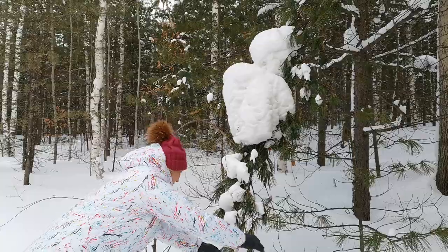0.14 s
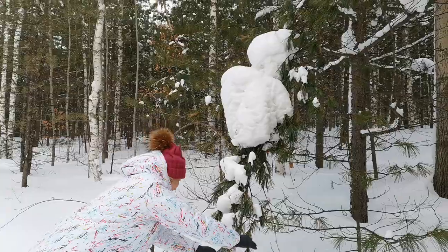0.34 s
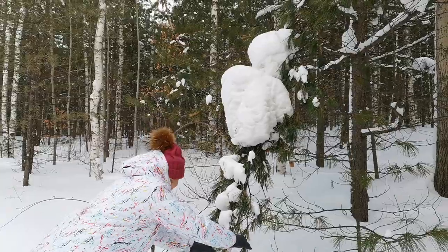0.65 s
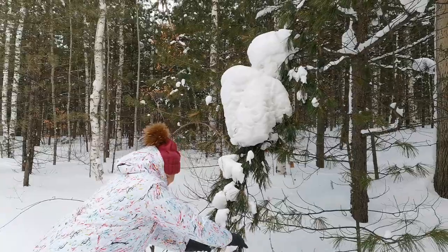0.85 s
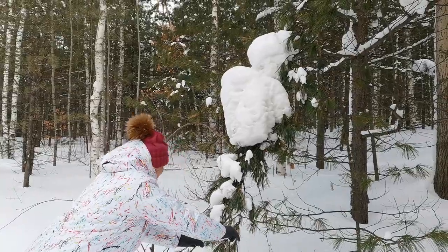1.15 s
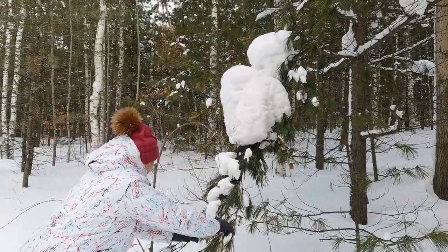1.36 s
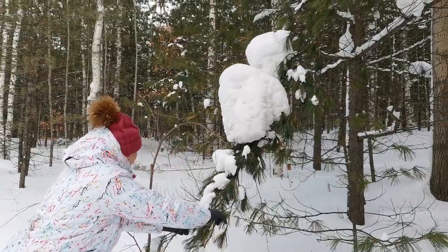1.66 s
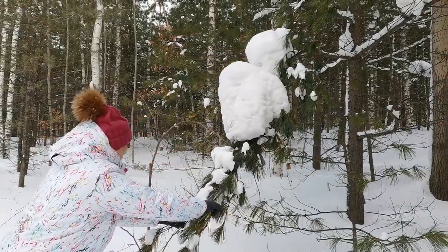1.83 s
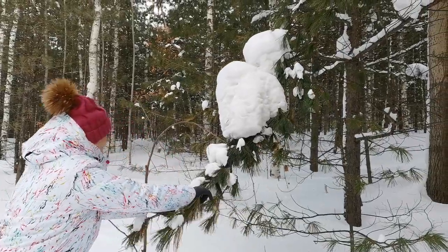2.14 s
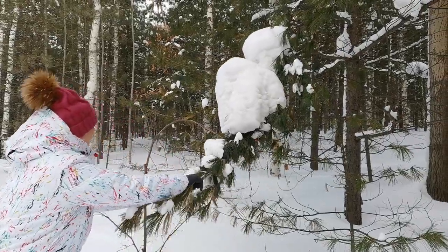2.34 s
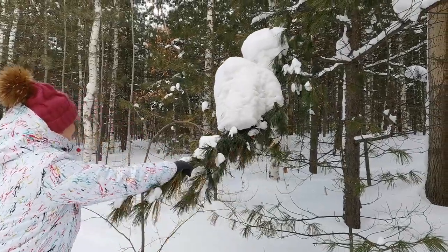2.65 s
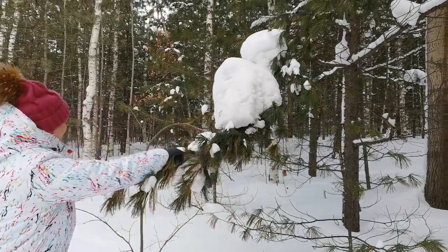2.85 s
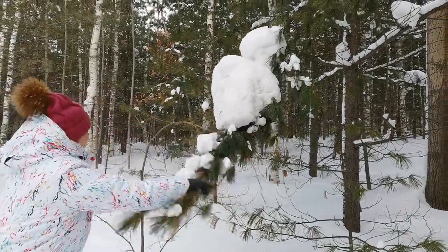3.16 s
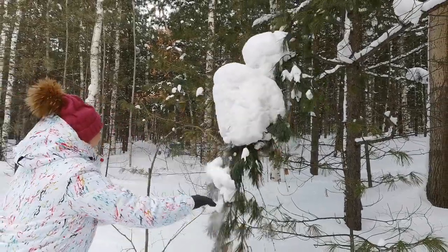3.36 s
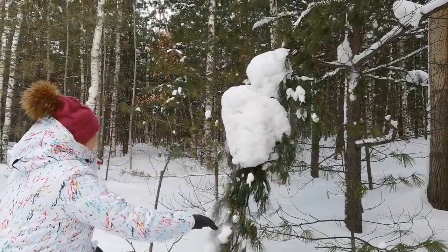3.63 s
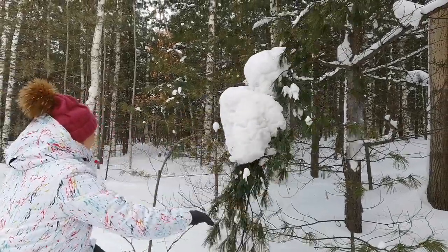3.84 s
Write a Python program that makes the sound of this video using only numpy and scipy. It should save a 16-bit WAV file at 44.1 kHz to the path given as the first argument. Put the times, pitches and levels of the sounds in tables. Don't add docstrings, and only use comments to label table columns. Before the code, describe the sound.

Packed snow creaks and crunches softly while coat and frozen pine needles rustle and tick outdoors

```python
import sys
import numpy as np
from scipy import signal
from scipy.fft import rfft, irfft
from scipy.io import wavfile
from scipy.ndimage import uniform_filter1d

SR = 44100
rng = np.random.default_rng(int(sys.argv[2]) if len(sys.argv) > 2 else 0)


def inscribe(sig):
    pcm = np.round(np.clip(np.atleast_2d(sig).T, -1, 1) * 32767)
    wavfile.write(sys.argv[1], SR, pcm.astype(np.int16))


def decibels_to_gain(level_db):
    exponent = np.asarray(level_db, float) / 20
    return 10 ** exponent


N = 176400


def evened(x):
    return x / np.sqrt(np.mean(x ** 2) + 1e-20)


def colour(x, points, late_s=0):
    hz = np.fft.rfftfreq(N, 1 / SR)
    f, db = np.transpose(points)
    gain = decibels_to_gain(np.interp(np.log(hz + 1), np.log(f), db))
    return irfft(rfft(x) * gain * np.exp(-2j * np.pi * hz * late_s), N)


def pair(x, other, same, late_s):
    same = np.clip(same, 0, 1)
    right = same * x + np.sqrt(1 - same ** 2) * other
    return np.array([x, colour(right, [(1, 0)], late_s)])


def drift(seconds):
    size = max(int(seconds * SR), 2)
    smooth = uniform_filter1d(rng.standard_normal(N), size)
    return evened(uniform_filter1d(smooth, size))


def add(mix, s, sound):
    part = mix[..., round(s * SR):][..., :sound.shape[-1]]
    part += sound[..., :part.shape[-1]]


def resonate(x, hz, width):
    r = np.exp(-np.pi * width / SR)
    return signal.lfilter([1 - r, 0, r - 1], [1, -2 * r * np.cos(2 * np.pi * hz / SR), r * r], x)


def swells(rows, share):
    t = np.arange(N) / SR
    total = np.zeros(N)
    for s, half, hz, db in rows:
        tone = resonate(rng.standard_normal(N), hz, share * hz)
        tone = evened(resonate(tone, hz, share * hz))
        total += decibels_to_gain(db) * np.exp(-((t - s) / half) ** 4) * tone
    return total


# multiple of the idle rate, level in dB, phase lead in cycles.
ORDERS = [(1, -70, .46), (2, -66, -.36), (3, -73, .46)]
# frequency in Hz, level in dB.
CLATTER = [(450, -16.5), (1000, 0), (1600, 0), (3350, -2.5), (3650, -13), (4100, -6.5), (4500, -0.5),
           (5100, -4.5), (5700, -13), (16000, -22)]
# frequency in Hz, width in Hz, level in dB.
CASING = [(930, 14, -2), (1386, 30, -3), (2072, 30, 0), (2490, 20, -5), (2745, 20, -3), (2841, 22, -1),
          (3100, 200, 3)]
IDLE_HZ, FIRST_S = 32.38, .4057
CLATTER_DB, CASING_DB, CLATTER_SAME = -54, -61.5, 0.58
VALVE_GAP_S, PUFF_S, STEADY = .002, 0.0049, 1


def engine():
    t = np.arange(N) / SR
    hum = sum(decibels_to_gain(db) * np.cos(2 * np.pi * (k * IDLE_HZ * t + ahead)) for k, db, ahead in ORDERS)

    turns = (t - FIRST_S) * IDLE_HZ + 0.014 * drift(0.27)
    since = (turns % 1) / IDLE_HZ
    strengths = decibels_to_gain(2.5 * np.clip(rng.standard_normal(200), -2, 1))
    force = strengths[turns.astype(int) + 20]
    late = since - VALVE_GAP_S
    first_knock = 0.88 * np.exp(-since / 0.0025)
    puff = (late > 0) * np.exp(-abs(late) / PUFF_S)
    second_knock = 0.21 * np.exp(-((since - .012) / 0.0016) ** 2)
    gate = STEADY + force * (first_knock + puff + second_knock)
    drive = gate * rng.standard_normal((2, N)) * decibels_to_gain(0.64 * drift(0.005))

    ring = np.zeros((2, N))
    for hz, width, db in CASING:
        ring += decibels_to_gain(db) * evened(resonate(drive, hz, width)) * decibels_to_gain(2.5 * drift(.05))
    noise = decibels_to_gain(CLATTER_DB) * evened(colour(drive, CLATTER)) + decibels_to_gain(CASING_DB) * evened(ring)
    balance = decibels_to_gain(np.array([[-1], [1]]) * 0.96)
    return hum + balance * pair(*noise, CLATTER_SAME, 0.00037)


# frequency in Hz, level in dB.
RUMBLE = [(15, -2), (40, -14), (80, -5.5), (140, -2), (220, -1.5), (330, -10), (550, -11.5), (1200, -23.5)]
RUMBLE_DB, RUMBLE_SAME = -60, .985
OPEN_S = .3812


def rumble():
    opening = np.exp(-abs(np.arange(N) / SR - OPEN_S) / 0.1)
    lumps = decibels_to_gain(1.4 * drift(0.04) + 3 * opening)
    air = evened(colour(rng.standard_normal((2, N)), RUMBLE)) * lumps
    return decibels_to_gain(RUMBLE_DB) * pair(*air, RUMBLE_SAME, 0.00019)


# time in seconds, level in dB.
SWAY = [
    (.4, -71),
    (1.05, -63.5),
    (1.4, -51.5),
    (2.05, -57),
    (2.85, -50),
    (3.7, -48.5),
    (4, -49.5),
]
# start in seconds, length in seconds, level in dB, brightness in dB.
STROKES = [(1.04, 0.026, -54, -5), (1.113, 0.16, -49, -6.5), (1.417, 0.087, -50, 3),
           (1.563, 0.055, -53.5, 1), (1.66, 0.08, -54, 0), (1.771, 0.024, -42.5, 0.5),
           (1.897, 0.082, -45, -1), (2.057, 0.054, -51.5, -7), (2.184, 0.076, -52.5, 1.5),
           (2.311, 0.089, -49.5, -1), (2.452, 0.16, -56, 2), (2.948, 0.129, -47, 2),
           (3.111, 0.02, -40.5, -3.5), (3.194, 0.079, -48.5, 1.5), (3.29, 0.079, -60, 10.5),
           (3.397, 0.29, -51, 4), (3.823, 0.049, -47.5, -1)]
# frequency in Hz, level in dB.
RUB = [(600, -2), (2000, -5), (5000, -2.5), (8000, -1), (16000, -5)]
# centre in seconds, half length in seconds, pitch in Hz, level in dB.
SQUEAKS = [
    (1.16, 0.028, 7450, -61.5),
    (1.63, 0.024, 8050, -58),
    (3.06, 0.11, 6730, -59.5),
    (3.53, 0.15, 7030, -61),
    (3.87, 0.022, 7600, -60),
    (1.25, 0.078, 7220, -64),
]
RUSTLE_DB, STROKE_EDGE_S, RUSTLE_SAME, SPLIT_HZ = -3, 0.016, 0.21, 10800
SNAPS_PER_S, SNAP_S = 260, .0005
RUSTLE_LATE_S = 0.000413


def rustle():
    t = np.arange(N) / SR
    dull = bright = decibels_to_gain(np.interp(t, *np.transpose(SWAY))) ** 2
    for s, length, db, bright_db in STROKES:
        outside = abs(t - s - length / 2) - length / 2
        shape = 1 / (1 + np.exp(np.clip(outside * 4 / STROKE_EDGE_S, -50, 50)))
        dull = dull + shape * decibels_to_gain(db) ** 2
        bright = bright + shape * decibels_to_gain(db + bright_db) ** 2

    snaps = rng.random(N) < SNAPS_PER_S / SR
    grains = snaps * decibels_to_gain(3 * np.minimum(rng.exponential(1, N), 2.5) - 2)
    grains = signal.lfilter([1], [1, -np.exp(-1 / (SNAP_S * SR))], grains)
    hiss = rng.standard_normal((2, N)) * (1 + grains) * decibels_to_gain(1.26 * drift(0.032))
    hiss = evened(colour(hiss, RUB))
    low = colour(hiss, [(SPLIT_HZ * 0.91, 0), (SPLIT_HZ * 0.81, -40)])
    out = decibels_to_gain(RUSTLE_DB) * (low * np.sqrt(dull) + (hiss - low) * np.sqrt(bright))
    out = out + swells(SQUEAKS, 0.12) * (1 + 0.9 * grains)
    return pair(*out, RUSTLE_SAME, RUSTLE_LATE_S)


# start in seconds, level in dB, brightness in dB.
TICKS = [(0.607, -51, -24), (0.6258, -50, -23), (0.6434, -52, -24), (0.6955, -49, -17), (0.7253, -51, -14),
         (0.746, -54, -16), (0.777, -48, -25), (0.816, -47, -17), (0.8474, -47, -23), (0.8603, -43.5, -29),
         (0.8795, -45.5, -28), (0.9188, -52, -23), (0.9752, -66, -19), (1.029, -49, -19),
         (1.0485, -50, -20), (1.1985, -53, -33), (1.2898, -50, -28), (1.3203, -49, -19), (1.405, -41, -19),
         (1.446, -42.5, -11), (1.475, -46, -11), (1.4877, -47, -17), (1.507, -47, -9), (1.533, -46, -21),
         (1.55, -49, -20), (1.605, -39.5, -31), (1.61, -41, -24), (1.614, -41, -24), (1.6187, -48, -19),
         (1.6254, -50, -20), (1.6314, -50, -21), (1.6374, -48, -16), (1.6425, -40, -23), (1.6493, -38, -20),
         (1.667, -50, -5), (1.673, -55, -15), (1.7034, -50, -7), (1.712, -56, -5), (1.722, -54, -12),
         (1.7737, -55, -18), (1.7864, -56, -13), (1.8251, -43, -23), (1.886, -51, -14), (1.9269, -43, -16),
         (2.1895, -51, -12), (2.1965, -36.5, -16), (2.2424, -46, -12), (2.2894, -53, -13),
         (2.384, -43, -19), (2.4153, -45, -21), (2.4677, -53, -6), (2.5265, -54, -5), (2.5543, -41, -12),
         (2.676, -43.5, -16), (2.8495, -42, -10), (2.9158, -45, -16), (2.9982, -36, -22),
         (3.1157, -44, -23), (3.3338, -49, -13), (3.9496, -42, -11)]
TICK_HZ, TICK_WIDTH_HZ, TICK_S, TICK_DB, TICK_BRIGHT_DB = 7600, 740, .0011, 3.5, 18


def needle_ticks():
    ticks = np.zeros((2, N))
    n = np.arange(300)
    fall = np.minimum(n / 20, 1) * np.exp(-n / SR / TICK_S)
    for (s, db, bright_db), (ring, wide) in zip(TICKS, rng.standard_normal((60, 2, 2, 300))):
        ring = evened(resonate(ring, TICK_HZ, TICK_WIDTH_HZ))
        add(ticks, s, decibels_to_gain(db + TICK_DB) * fall * (ring + decibels_to_gain(bright_db + TICK_BRIGHT_DB) * wide))
    ticks = colour(ticks, [(1500, 4), (5000, -6), (9000, 0.5), (16000, -6)])
    return pair(*ticks, RUSTLE_SAME, RUSTLE_LATE_S)


# centre in seconds, half length in seconds, pitch in
# Hz, level in dB.
GROANS = [
    (1.18, .028, 290, -58),
    (1.245, .028, 300, -54),
    (2.36, .015, 240, -52),
    (3.87, .04, 90, -60),
    (3.55, .35, 680, -65),
    (.4, .025, 200, -56),
    (1.49, .05, 150, -55),
    (1.965, .02, 350, -54),
]
# start in seconds, level in dB, pitch in Hz.
SHIFTS = [(0.681, -49, 550.0), (1.176, -47, 298), (1.2, -51, 330), (1.218, -61, 350), (1.235, -54, 453),
          (1.282, -45, 650), (1.305, -45, 700), (1.332, -40, 650), (1.367, -43, 700), (1.6627, -42, 710),
          (1.9229, -39.5, 395), (1.9295, -41, 477), (1.933, -44, 343), (1.9419, -45, 260),
          (1.955, -35, 554), (1.9645, -44, 382), (1.9755, -42.5, 272), (2.3226, -35, 228),
          (2.3322, -39, 260), (2.339, -35.5, 560), (2.3444, -37, 288), (2.3558, -38, 480), (2.36, -42, 247),
          (2.879, -40, 710), (2.92, -41, 332), (3.24, -43, 850), (3.312, -54, 600)]
# start in seconds, level in dB.
CREAK = [(1.2545, -46), (1.2649, -44), (1.274, -41), (1.2848, -39.5), (1.2983, -37.5), (1.3128, -39),
         (1.3242, -36), (1.3382, -36), (1.3502, -37.5), (1.361, -36), (1.3734, -41), (1.3874, -36),
         (1.4059, -37.5), (1.419, -42), (1.4287, -36), (1.4419, -44), (1.4476, -36.5), (1.4666, -40),
         (1.4787, -40.5), (1.4898, -34.5), (1.5079, -39.5), (1.534, -47), (1.5512, -38.5), (1.5764, -44.5),
         (1.662, -41)]
# start in seconds, level in dB, pitch in Hz.
CRUNCH = [(2.977, -34, 335), (2.9853, -31.5, 408), (2.9913, -30, 408), (2.9975, -31, 590),
          (3.0007, -32, 484), (3.0097, -32, 525), (3.0132, -29.5, 470), (3.025, -40, 332),
          (3.0321, -30, 950), (3.0335, -31.5, 620), (3.0368, -36, 257), (3.0423, -34.5, 360),
          (3.0425, -38, 900), (3.0464, -37, 256), (3.051, -38.5, 390), (3.1105, -35.5, 500),
          (3.1122, -31.5, 480), (3.1184, -30, 282), (3.1221, -37, 285), (3.1278, -44, 400),
          (3.132, -29.5, 344), (3.9516, -29.5, 830), (3.9528, -28, 335), (3.9564, -32, 252),
          (3.9609, -32, 285), (3.9645, -45, 262), (3.9686, -33, 325), (3.973, -32, 260), (3.9773, -30, 390),
          (3.987, -40, 219)]
CREAK_HZ, WEAK_HZ_PER_DB = 333, 24
PACK_HZ, PACK_WIDTH_HZ, PACK_DB = 240, 110, -8
SLIP_CYCLES, SLIP_EDGE_DB, SLIP_GRIT_DB = .64, -12, -21
CRUMBS_DB, CRUMBS_S = -6.5, 0.005


def snow():
    out, busy = np.zeros(N), np.zeros(N)
    t = np.arange(-441, 441) / SR
    creak = [(s, db, CREAK_HZ - WEAK_HZ_PER_DB * (db + 37.5)) for s, db in CREAK]
    for (s, db, hz), luck in zip(creak + SHIFTS + CRUNCH, rng.random((99, 3))):
        u = t * hz
        span = np.where(u < 0, .9 * SLIP_CYCLES, 1.05 * SLIP_CYCLES)
        shape = np.exp(-(u / span) ** 2)
        push = -shape * np.cos(2 * np.pi * u + 1.2 * (luck[0] - .5))
        edge_cycles = u * (1.48 + 0.76 * luck[1]) + luck[2]
        edge = decibels_to_gain(SLIP_EDGE_DB) * shape ** 2 * np.cos(2 * np.pi * edge_cycles)
        add(out, s - .01, decibels_to_gain(db) * (push + edge))
        add(busy, s - .01, decibels_to_gain(db) * shape)
    out = colour(out, [(70, -20), (170, 0)])

    grit = evened(colour(rng.standard_normal((2, N)), [(1500, -8), (3000, -4), (9000, -22)]))
    grit = decibels_to_gain(SLIP_GRIT_DB) * busy * grit
    crumbs = evened(colour(rng.standard_normal(N),
                           [(110, -22), (220, 4.0), (450, -10.5), (1100, -11.0), (1600, -36)]))
    out += decibels_to_gain(PACK_DB) * resonate(out, PACK_HZ, PACK_WIDTH_HZ) + swells(GROANS, 0.52)
    keep = np.exp(-1 / (CRUMBS_S * SR))
    out += decibels_to_gain(CRUMBS_DB) * signal.lfilter([1 - keep], [1, -keep], busy) * crumbs
    return pair(out, out, 1, 0.00015) + pair(*grit, 0.78, 0.000414)


def scene():
    return engine() + rumble() + rustle() + needle_ticks() + snow()


def roll_off(x):
    return signal.sosfilt(signal.butter(12, 15700, fs=SR, output="sos"), x)


# frequency in Hz, level in dB.
LEFT_PORT = [(4500, 1), (5500, -9.5), (7000, -8.5), (7900, -16.5), (9000, -3.5), (10800, -4), (14300, -15),
             (15700, -40)]
# frequency in Hz, level in dB.
RIGHT_PORT = [(4800, 0.5), (5700, -4), (6900, 5.5), (7700, 4), (8400, -5.5), (9300, -11), (10200, -36.5),
              (15500, -18.5)]
SETTLE_DB, SETTLE_S, OFFSET = 2.5, 0.082, -0.00026


def record(dry):
    t = np.arange(N) / SR - OPEN_S
    left = colour(dry[0], LEFT_PORT)
    right = decibels_to_gain(0.45) * colour(dry[1], RIGHT_PORT)
    heard = np.array([left, right]) + OFFSET
    settle = decibels_to_gain(SETTLE_DB * np.exp(-abs(t) / SETTLE_S) + 6 * np.exp(-abs(t) / .004))
    return roll_off(heard * (t > 0) * settle)


dry = scene()
out = record(dry)
inscribe(out)
```